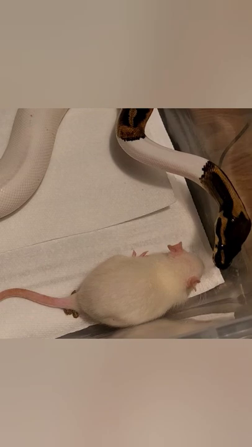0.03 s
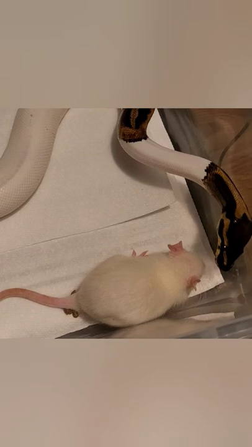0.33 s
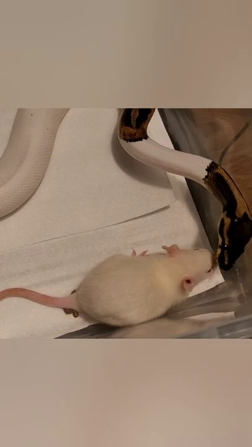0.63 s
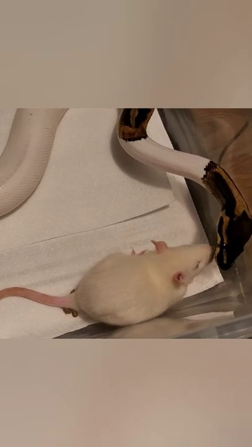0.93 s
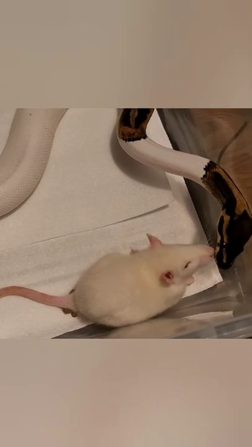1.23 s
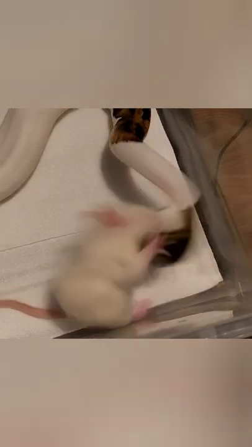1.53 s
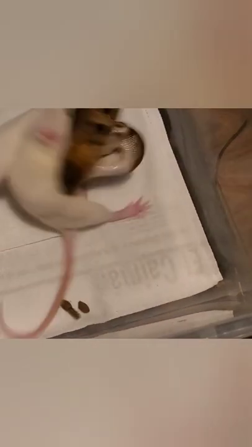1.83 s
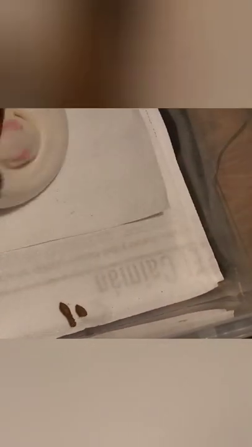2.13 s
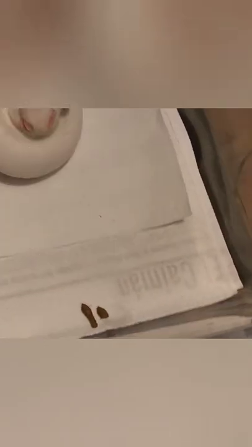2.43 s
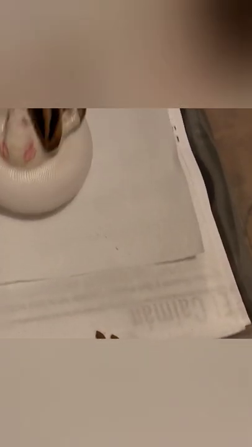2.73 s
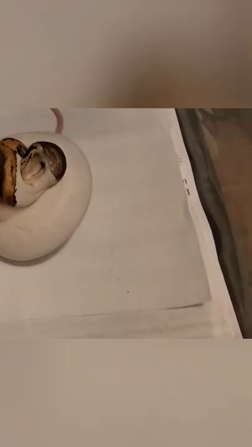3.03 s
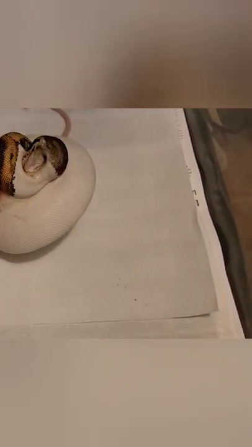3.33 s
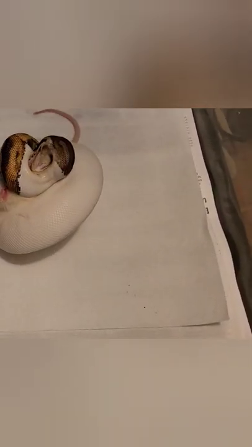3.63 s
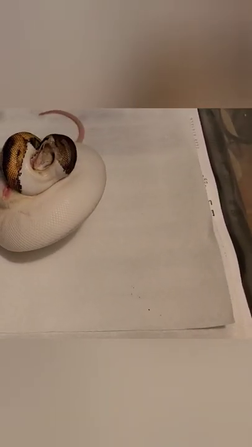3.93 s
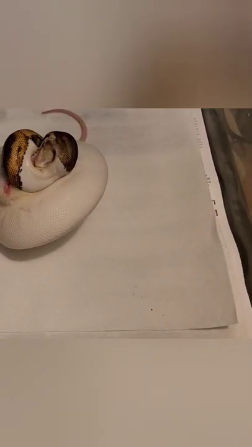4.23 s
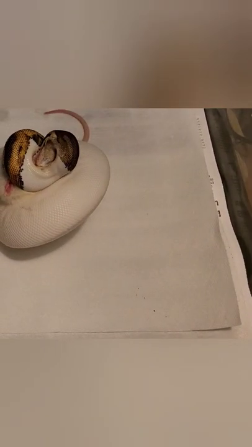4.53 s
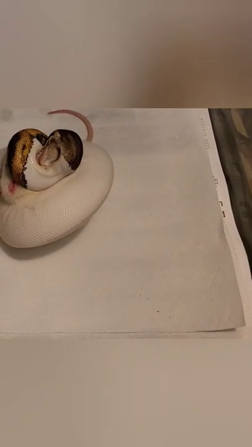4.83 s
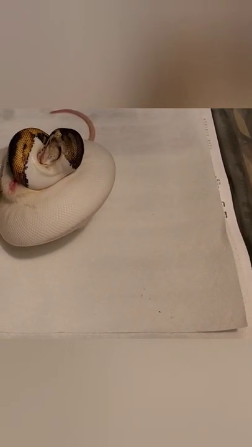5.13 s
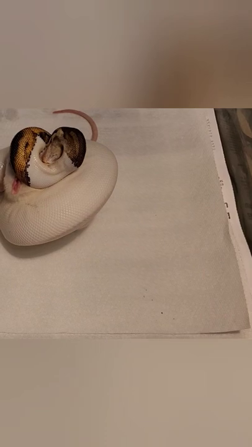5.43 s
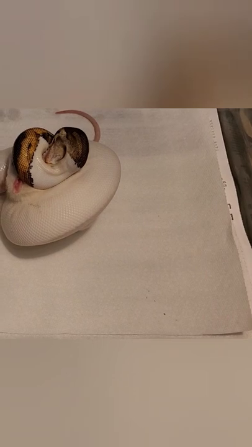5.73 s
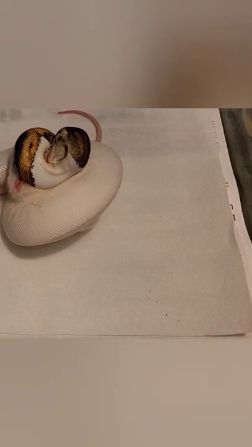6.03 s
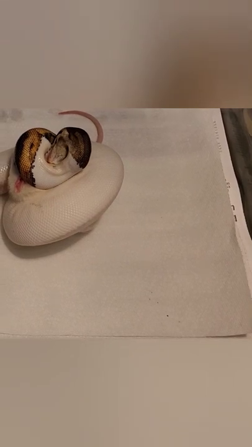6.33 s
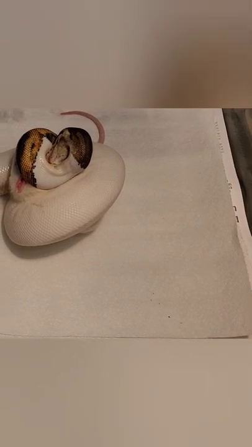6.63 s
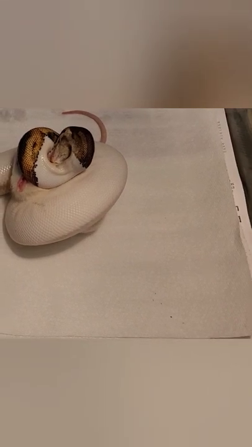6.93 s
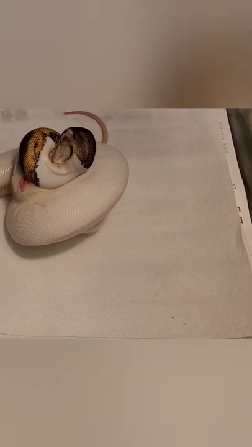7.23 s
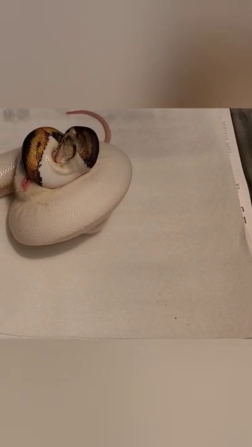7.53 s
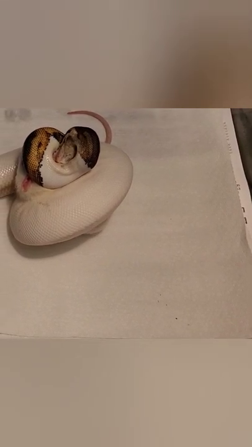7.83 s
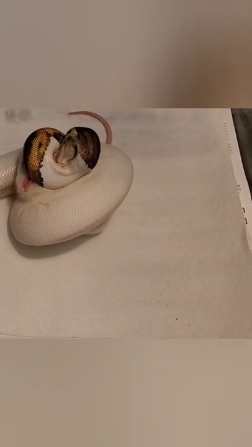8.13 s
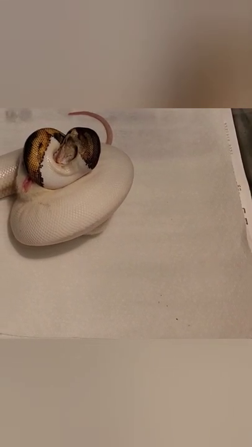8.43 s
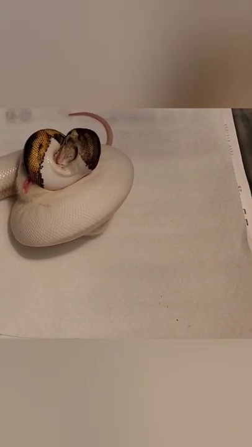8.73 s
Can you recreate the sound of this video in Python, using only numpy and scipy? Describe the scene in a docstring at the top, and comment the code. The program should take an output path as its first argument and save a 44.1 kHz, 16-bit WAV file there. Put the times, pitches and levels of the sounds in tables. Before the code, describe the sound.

A low ventilation rumble fills a quiet room. Then a snake strikes a rat in a nearby plastic tub: a quick flurry of hollow thumps, knocks and sharp slaps on the paper lining, over in less than a second. Scales slide across the paper more and more softly as the coil tightens, and the creases give a few small ticks before only the hum is left.

```python
"""Snake strike in a plastic tub.

A snake strikes a rat in a paper-lined tub. The bodies slam on floor and walls in a quick run of
thumps and slaps; then scales slide over the paper as the coil tightens, and creases give a few
last ticks. Low ventilation rumbles in the quiet room."""
import sys
import numpy as np
from scipy import signal
from scipy.fft import rfft, irfft
from scipy.io import wavfile
from scipy.ndimage import map_coordinates

SR = 44100
rng = np.random.default_rng(int(sys.argv[2]) if len(sys.argv) > 2 else 0)


def put_to_file(sound):
    """Save the sound as 16-bit audio at rate SR, in the file named by the first command-line argument."""
    columns = np.atleast_2d(sound).T  # one column per channel
    safe = np.clip(columns, -1, 1)
    whole_steps = np.round(safe * 32767)
    wavfile.write(sys.argv[1], SR, whole_steps.astype(np.int16))


N = 396900
TIME = np.arange(N) / SR
AGE = TIME[:SR * 3 // 5]  # clock of one event, 0.6 s


# Body impacts: (time [s], knock [dB], thud [dB], slap [dB], knock centre [Hz], thud centre [Hz],
# slap centre [Hz], tub pitch [Hz], pan [dB])
BLOWS = [(1.7119, -22, -38.5, -21.5, 686, 240, 4296, 288, 2.5),
         (1.8, -38.5, -52, -34, 650, 160, 3200, 335, .3),
         (1.8084, -33, -52.5, -26, 1120, 170, 1901, 330, 0.5),
         (1.8641, -17, -20, -29, 335, 155, 1500, 274, 2.4),
         (1.8744, -20.5, -21, -39.5, 260.7, 100, 2000, 298, 1.5),
         (1.888, -27, -29, -48, 479.4, 55, 2000, 300, -1.5),
         (1.9159, -15.5, -27, -17.5, 510, 226.6, 3900, 337, 0),
         (1.938, -29.5, -30, -45.5, 370, 60.2, 2500, 361, 1),
         (1.9714, -20, -34.5, -19, 670, 109.9, 1710, 300, 1.2),
         (1.9835, -30.5, -42, -30.5, 698.6, 110, 2000, 321.3, -0.5),
         (2.1678, -25.5, -33.5, -37, 437, 156, 3900, 296, 1),
         (2.2122, -31, -25, -40, 283, 109, 1690, 312, 1), (2.221, -35.5, -36, -37, 910, 198, 1800, 315, 1),
         (2.243, -34, -27, -46, 430, 46, 2090, 291, 0), (2.296, -45.5, -42, -64, 300, 100, 2600, 293, -2.5),
         (2.325, -42, -33.5, -43.5, 605, 58.3, 2450, 297, 1),
         (2.42, -38.5, -33, -51, 332, 140, 3400, 314, 1.2),
         (2.437, -50.5, -39, -54, 275, 145.4, 3030, 286, 1),
         (2.586, -58, -52.5, -59, 500, 130.6, 1400, 293, 0),
         (3.056, -62, -41.5, -81, 260, 55, 3190, 291, -0.2)]

def blows(low_cut_hz=19):
    """Each blow bends the floor, knocks the walls and slaps the paper; flesh sounds lower than bone."""
    out = np.zeros((2, N))
    for s, knock_db, thud_db, slap_db, knock_hz, thud_hz, slap_hz, tub_hz, pan_db in BLOWS:
        thud = from_db(thud_db) * floor_thud(thud_hz)
        knock = from_db(knock_db) * wall_knock(knock_hz, tub_hz)
        slap = from_db(slap_db) * (paper_slap(slap_hz) + paper_crack(slap_hz))
        add(out, s, panned(thud + knock + slap, db=pan_db))
    return signal.sosfilt(signal.butter(2, low_cut_hz, "high", fs=SR, output="sos"), out)


# Tub floor modes: (frequency [Hz], relative level [dB], t60 [s])
FLOOR_MODES = [(47.25, -3, 0.32), (64.3, 2.5, 0.15), (94, -15, 0.06), (139.4, 0, 0.093),
               (178.8, 0.5, 0.068), (215.7, -4.5, 0.032)]
DETUNE = 0.013  # relative pitch scatter: each blow meets the tub bent differently

def floor_thud(hz, rise_cycles=0.74):
    """The flexible floor rings as a body presses into it."""
    floor = ring(FLOOR_MODES, scatter_db=5, spread_rad=1, detune=DETUNE) * rise(rise_cycles / hz)
    return panned(unit_onset(bandpass(floor, hz, octaves=0.61), samples=1500), db=0.5)


# Plastic wall modes: (frequency [Hz], relative level [dB], t60 [s])
WALL_MODES = [(278.5, 0.5, 0.085), (360, -10, 0.074), (421.7, -11, .1), (453, -7.5, 0.09),
              (490, -2.5, 0.026), (559, -3.5, 0.043), (602, -7, 0.064), (725, -2, 0.072),
              (775, -5.5, 0.069), (815, -4.5, 0.058), (1000, -9, 0.055), (1142.6, -8, 0.058)]
# Wall clatter spectrum: (frequency [Hz], relative density [dB])
CLATTER_SPECTRUM = [(120, -15.5), (250, -2.5), (500, -2.5), (800, -6.5), (1100, -6.5), (1400, -12),
                    (3000, -36)]

def wall_knock(hz, tub_hz, clatter_db=1, punch_db=7, rise_cycles=0.93):
    """The walls ring and clatter; body load shifts the lowest mode most, soft contact builds slowly."""
    clatter = echoed(smack(CLATTER_SPECTRUM, t60=0.09, spike=1.5, spike_s=0.0025), tub_hz)
    shift = tub_hz / WALL_MODES[0][0]
    loaded = [(mode_hz * shift ** (1 / (k + 1)), db, t60)
              for k, (mode_hz, db, t60) in enumerate(WALL_MODES)]
    walls = ring(loaded, scatter_db=3.5, spread_rad=1, detune=DETUNE) + from_db(clatter_db) * clatter
    knock = bandpass(walls * rise(rise_cycles / hz), hz, octaves=0.89)
    return unit_onset(knock, samples=1300) + from_db(punch_db) * punch(hz)


def punch(hz, width_cycles=0.32, right_lag_s=0.00012):
    """The wall gives way and springs back: one pressure swing."""
    phase = hz * (AGE - np.array([[0], [right_lag_s]])) / width_cycles - 2
    return (2 * phase ** 2 - 1) * np.exp(-phase ** 2) * rise(1 / (2 * np.pi * hz))


def echoed(x, tub_hz, echo_gain=0.42):
    """Add one return from the far wall, a period of the tub's pitch later."""
    return x + echo_gain * np.array([np.interp(AGE - 1 / tub_hz, AGE, side, left=0) for side in x])


# Paper slap spectrum: (frequency [Hz], relative density [dB])
SLAP_SPECTRUM = [(700, -14.5), (1400, 0.5), (2200, 0), (3500, -0.5), (5000, -3.5), (7000, -10),
                 (15000, -29.5)]
# Modes of the sheet on plastic: (frequency [Hz], relative level [dB], t60 [s])
SHEET_MODES = [(1700, -1, 0.12), (1930, -3, 0.049), (2430, -6.5, 0.094), (2300, -5, 0.065),
               (2580, -5.5, 0.038), (3500, -5.5, .04), (3780, -6, .05), (4250, -4.5, .035),
               (4960, -6.5, .05), (6150, -7.5, .04)]

def paper_slap(hz, sheet_db=-16):
    """The sheet is slapped flat and rings faintly."""
    slap = smack(SLAP_SPECTRUM, t60=0.04, spike=1.2, spike_s=0.00085) * crackle(depth_db=4)
    sheet = from_db(sheet_db) * ring(SHEET_MODES, scatter_db=1, spread_rad=0.9, detune=DETUNE)
    return unit_onset(bandpass(slap + sheet, hz, octaves=0.9), samples=130)


# Paper crack spectrum: (frequency [Hz], relative density [dB])
CRACK_SPECTRUM = [(2500, -22), (5000, -11), (7000, -2), (9500, -2.5), (13000, -6), (15500, -14)]

def paper_crack(slap_hz, ref_db=-13.5, ref_hz=3500, db_per_octave=11.5):
    """A slap also cracks, the louder the higher its pitch."""
    gain = from_db(ref_db + db_per_octave * np.log2(slap_hz / ref_hz))
    return gain * smack(CRACK_SPECTRUM, t60=0.06, spike=0.9, spike_s=0.002) * crackle(depth_db=-1)


# Large creases: (time [s], onset level [dB], centre [Hz], t60 [s], half width [octaves])
SNAPS = [(1.632, -62.5, 5900, 0.022, 0.47), (1.741, -39, 4000, 0.021, 0.66), (1.776, -48, 5500, 0.019, .6),
         (1.8, -43, 8000, 0.074, 1), (1.871, -26.5, 2700, 0.11, 0.87), (1.902, -41, 4480, .02, .8),
         (1.9875, -31, 5564, 0.017, .25), (2.007, -33, 3000, .02, .6), (2.117, -42.5, 2500, 0.018, 0.44),
         (2.162, -35.5, 6840, 0.037, 0.95), (2.198, -52, 4460, .015, .6), (2.219, -37, 2120, 0.12, 1.03),
         (2.586, -45.5, 2610, 0.074, 1.5), (2.872, -59.5, 3800, 0.031, .6), (3.121, -64.5, 7950, .06, .7),
         (3.206, -63.5, 4190, .02, .6), (3.449, -68, 7020, .03, 0.41), (3.464, -68.5, 6450, .03, 0.37),
         (3.503, -65.5, 2203, .05, 1.4), (3.644, -65, 1995, 0.063, 1.53), (4.0125, -77, 9500, 0.017, 0.32),
         (4.021, -61, 4390, 0.03, 0.55), (4.107, -67, 1690, 0.054, 1.44), (4.261, -72, 2405, 0.043, .7),
         (4.288, -57, 4000, 0.031, 0.93), (4.374, -56, 5670, 0.041, 0.76), (4.395, -65, 5480, 0.047, 0.83),
         (4.528, -73, 8990, 0.037, .8), (4.852, -72.5, 5780, 0.04, .2), (5.025, -74, 10000, .03, .7),
         (5.452, -72, 5600, 0.042, .13)]
# Paper rustle spectrum: (frequency [Hz], relative density [dB])
RUSTLE_SPECTRUM = [(200, -1.5), (500, -5), (1000, -3), (1500, -3.5), (2400, 1.5), (3100, 1), (4500, -4),
                   (6100, -3), (7500, -4.5), (10000, -7), (13000, -3.5), (15500, -10.5)]

def snaps():
    """A crease pops over with a sharp edge; the sheet rings briefly around one pitch."""
    out = np.zeros((2, N))
    for s, db, hz, t60, octaves in SNAPS:
        pop = smack(RUSTLE_SPECTRUM, t60, spike=0.46, spike_s=0.00075) * crackle(depth_db=2)
        add(out, s, from_db(db) * unit_onset(bandpass(pop, hz, octaves, order=2), samples=200))
    return out


def coil_effort(start_s=1.63, attack_s=0.1, hold_s=0.18, creep_fade_s=6.47):
    """Rubbing gain: the coil whips round the rat, slows steadily, then creeps to rest."""
    age = TIME - start_s
    wrap = hold_and_fade(db=-49.5, until_s=start_s + attack_s + hold_s, db_per_s=16.5)
    creep = hold_and_fade(db=-81.5, until_s=creep_fade_s, db_per_s=14)
    return np.clip(age / attack_s, 0, 1) ** 2 * np.hypot(wrap, creep)


# Brightness of the slide: (rubbing level [dB], treble gain [dB])
SLIDE_TREBLE = [(-73, -3.5), (-65.5, 2)]

def slide(effort, treble_hz=6500):
    """Scales slide over the paper, duller as the coil slows."""
    rub = scraping(N)
    dull = signal.sosfiltfilt(signal.butter(2, treble_hz, fs=SR, output="sos"), rub)
    treble_db = np.interp(20 * np.log10(effort + 1e-9), *np.transpose(SLIDE_TREBLE))
    return effort * (dull + from_db(treble_db) * (rub - dull))


def scraping(samples, catches_per_s=3000, friction=0.43):
    """Scales catch on paper fibres: tiny slips over a friction hiss."""
    slips = rng.random((2, samples)) < catches_per_s / SR
    excitation = (slips + friction) * rng.standard_normal((2, samples))
    return bending(coloured(excitation, RUSTLE_SPECTRUM, NEAR_CORRELATION))


def bending(x, depth_db=2.6, bends_per_s=24, band_hz=330):
    """As the sheet bends, each narrow band swells and fades by itself."""
    hz, s, bands = signal.stft(x, SR, nperseg=512)
    shapes = rng.standard_normal((128, int(s[-1] * bends_per_s) + 2))
    grid = np.meshgrid(hz / band_hz, s * bends_per_s, indexing="ij")
    db = depth_db * map_coordinates(shapes, grid, order=1, mode="nearest")
    return unit_rms(signal.istft(bands * from_db(db), SR)[1][:, :x.shape[1]])


# Body sweeps: (middle [s], level [dB], Gaussian sigma [s], centre [Hz], half width [octaves])
SWEEPS = [(0.598, -69, .018, 1350, 0.8), (1.665, -59.5, 0.017, 9950, 2.1), (1.691, -47, 0.015, 600, 0.67),
          (1.731, -44.5, 0.018, 8000, 0.94), (1.876, -53, 0.011, 8070, 1.4), (2.027, -39, 0.02, 7984, 2.6),
          (2.127, -42, 0.0066, 2770, 0.84), (2.252, -43.5, 0.039, 600, 0.36),
          (2.33, -49.5, 0.016, 6000, 1.2), (2.449, -42.5, 0.013, 8800, 4.9),
          (2.575, -56, 0.011, 2820, 0.61), (2.683, -53.5, 0.027, 4180, 0.68),
          (2.752, -61.5, 0.12, 11140, 0.73), (2.887, -62.5, 0.028, 3190, 0.39),
          (2.974, -64, 0.042, 3400, 0.28), (3.092, -64, 0.041, 3020, 0.65), (3.166, -67.5, 0.011, 3500, .6),
          (3.332, -65, 0.028, 3600, 1.37), (3.58, -75, 0.069, 2500, 1.2), (5.95, -78.5, 0.024, 11010, 1)]

def sweeps(strokes=SWEEPS):
    """A body brushes across the sheet, its speed rising and falling."""
    out = np.zeros((2, N))
    middle_s = AGE[-1] / 2
    for s, db, sigma_s, hz, octaves in strokes:
        swell = np.exp(-0.5 * ((AGE - middle_s) / sigma_s) ** 2)
        rub = unit_rms(bandpass(scraping(len(AGE)), hz, octaves))
        add(out, s - middle_s, from_db(db) * swell * rub)
    return out


def crinkles(effort, per_s=9, scatter_db=1.5, centre_hz=3400):
    """Small creases give way at random under the coil, as loud as it presses."""
    triggers = (rng.random(N) < per_s / SR) * effort * from_db(scatter_db * rng.uniform(-1, 1, N))
    pop = bandpass(burst(RUSTLE_SPECTRUM, t60=0.049, rise_s=0.0004), centre_hz, octaves=0.5)
    return signal.fftconvolve(triggers[None], unit_onset(pop, samples=200), axes=1)[:, :N]


# Squeak resonances: (frequency [Hz], level [dB])
SQUEAK_BANDS = [(3150, -51.5), (7270, -52)]

def squeak(time_s=2.455, sigma_s=0.0065, octaves=0.023):
    """One fast sweep of scales on plastic excites two narrow resonances."""
    return sweeps([(time_s, db, sigma_s, hz, octaves) for hz, db in SQUEAK_BANDS])


# Taut crease modes: (frequency [Hz], level [dB], t60 [s])
CLICK_MODES = [(3100, -56, 0.016), (3300, -55, 0.021), (5590, -52, 0.022), (5910, -54, 0.016)]

def click(time_s=4.019):
    """One taut crease clicks with a short, clear ring."""
    out = np.zeros((2, N))
    add(out, time_s, ring(CLICK_MODES, scatter_db=1, spread_rad=0.26) * crackle(depth_db=1))
    return out


# Reverb decay of tub and room: (frequency [Hz], t60 [s])
ROOM_T60 = [(60, 0.6), (300, 0.7), (600, 0.6), (1200, 0.8), (4000, 0.16), (14000, 0.66)]
# Reverb strength: (frequency [Hz], impulse response energy per octave [dB])
ROOM_DB = [(60, -20), (300, -11), (700, -15.5), (1300, -15), (4000, -7), (14000, -14)]

def room(x, build_s=0.0012):
    """Diffuse echoes build quickly and die at their own rate in each octave."""
    tail = 0
    edges_hz = 40 * 2. ** np.arange(10)
    for low, high in zip(edges_hz, edges_hz[1:]):
        hz = np.sqrt(low * high)
        octave = signal.butter(2, [low, high], "band", fs=SR, output="sos")
        band = signal.sosfilt(octave, rng.standard_normal((2, len(AGE))))
        envelope = decay(at_hz(ROOM_T60, hz)) * (1 - np.exp(-(AGE / build_s) ** 2))
        tail = tail + band * envelope / np.linalg.norm(envelope) * from_db(at_hz(ROOM_DB, hz))
    return signal.fftconvolve(x, tail, axes=1)[:, :N]


# Ventilation spectra: (frequency [Hz], relative density [dB])
RUMBLE_SPECTRUM = [(12, -71.5), (20, -40), (32, -19.5), (46, -9), (70, 0), (97, -8.5), (118, -17),
                   (160, -15.5), (235, -25.5), (400, -49.5), (1000, -90)]
AIR_SPECTRUM = [(220, -16.5), (300, 0.5), (338, -5.5), (410, -2.5), (520, -8), (780, -12), (1030, -17.5),
                (1920, -22), (2500, -44), (3250, -65), (5500, -105)]
HISS_SPECTRUM = [(1500, -22.5), (1950, -1.5), (2500, -9.5), (3200, 0.5), (4700, 2), (5500, -12),
                 (7000, -14), (8200, -20.5), (10300, -21.5), (12300, -16), (15500, -20)]
# Air rush: (time [s], level [dB])
AIR_LEVEL = [(0, -65.5), (1.5, -65), (3.2, -65), (5.6, -65.5), (7.0, -65.5), (7.8, -64), (8.2, -66),
             (9, -65.5)]
# Steady tones: (frequency [Hz], level [dB])
WHINE_TONES = [(312, -80), (361, -77.5), (1884, -95), (2126, -101), (4650, -96), (4716, -93), (5599, -103),
               (7402, -107), (10261, -108), (12199, -107), (12398, -106), (14659, -105)]
# Stereo image of far sound: (frequency [Hz], left-right correlation [-1..1])
FAR_CORRELATION = [(60, 0.94), (130, 0.98), (290, 0.46), (640, -0.29), (1410, -0.48), (3100, -0.03),
                   (6820, -0.099), (15000, 0.18)]

def ventilation(rumble_db=-56.5, hiss_db=-73.5, waver_db=0.4, wavers_per_s=5):
    """Distant ventilation: a wavering rumble, a soft rush of air, a faint hiss and a thin whine."""
    def noise(spectrum):
        return coloured(rng.standard_normal((2, N)), spectrum, FAR_CORRELATION)

    waver = np.interp(TIME * wavers_per_s, np.arange(2000), rng.standard_normal(2000))
    rumble = from_db(rumble_db + waver_db * waver) * noise(RUMBLE_SPECTRUM)
    air = from_db(np.interp(TIME, *np.transpose(AIR_LEVEL))) * noise(AIR_SPECTRUM)
    hiss = from_db(hiss_db) * noise(HISS_SPECTRUM)
    whine = sum(from_db(db) * np.sin(2 * np.pi * (hz * TIME + rng.random((2, 1))))
                for hz, db in WHINE_TONES)
    return rumble + air + whine + panned(hiss, db=1.12)


# Stereo image of near sound: (frequency [Hz], left-right correlation [-1..1])
NEAR_CORRELATION = [(60, 0.93), (250, 0.46), (600, 0.54), (1500, -0.0028), (3500, -0.54), (8000, 0.023),
                    (15000, 0.2)]

def burst(spectrum, t60, rise_s):
    """Modes too dense to tell apart, struck at once and dying together."""
    noise = coloured(rng.standard_normal((2, len(AGE))), spectrum, NEAR_CORRELATION)
    return noise * decay(t60) * rise(rise_s)


def smack(spectrum, t60, spike, spike_s):
    """A flat hit: a sharp spike, then a short dying spray."""
    return burst(spectrum, t60, rise_s=0.0001) * (1 + spike * np.exp(-AGE / spike_s))


def ring(modes, scatter_db, spread_rad, detune=0):
    """Struck modes; higher ones reach the two ears further out of phase."""
    out = np.zeros((2, len(AGE)))
    for k, (hz, db, t60) in enumerate(modes):
        size = np.searchsorted(AGE, 2 * t60)
        phase = np.array([[1], [-1]]) * spread_rad * np.sqrt(hz / 1000) * (-1) ** (k // 2)
        gain = from_db(db + scatter_db * rng.normal()) * (-1) ** (k // 3)
        pitch_hz = hz * (1 + detune * rng.normal())
        out[:, :size] += gain * decay(t60)[:size] * np.sin(2 * np.pi * pitch_hz * AGE[:size] + phase)
    return out


def crackle(depth_db, step_s=0.00063):
    """Jumping gain of paper giving way in quick, uneven cracks."""
    steps = np.clip(rng.standard_normal(3000), -2, 2)
    return from_db(depth_db * np.interp(AGE / step_s, np.arange(len(steps)), steps))


def coloured(white, spectrum, correlation):
    """Shape two independent noises to a stereo pair of unit rms."""
    size = white.shape[1]
    hz = np.fft.rfftfreq(size, 1 / SR)
    low_cut = np.minimum(hz / spectrum[0][0], 1) ** 2
    mid, side = rfft(white) * from_db(at_hz(spectrum, hz)) * low_cut
    alike = np.clip(at_hz(correlation, hz), -0.99, 0.99)
    return unit_rms(irfft(np.sqrt(1 + alike) * mid + np.sqrt(1 - alike) * side * [[1], [-1]], size))


def bandpass(x, hz, octaves, order=1):
    """Causal band-pass; octaves is the half width."""
    edges = np.clip([hz / 2 ** octaves, hz * 2 ** octaves], [20, 100], [SR / 4, SR * 0.45])
    return signal.sosfilt(signal.butter(order, edges, "band", fs=SR, output="sos"), x)


def rise(tau_s):
    return 1 - np.exp(-AGE / tau_s)


def decay(t60):
    return np.exp(-np.log(1000) * AGE / max(t60, 0.003))


def hold_and_fade(db, until_s, db_per_s):
    return from_db(db - db_per_s * np.maximum(TIME - until_s, 0))


def from_db(db):
    return 10 ** (np.asarray(db) / 20)


def unit_rms(x):
    return x / np.sqrt(np.mean(x ** 2) + 1e-20)


def unit_onset(x, samples):
    """Scale so the first samples have unit rms."""
    return x / np.sqrt(np.mean(x[:, :samples] ** 2) + 1e-20)


def at_hz(points, hz):
    """Read a table along log frequency."""
    known_hz, value = np.transpose(points)
    return np.interp(np.log(np.maximum(hz, 1)), np.log(known_hz), value)


def panned(x, db):
    """Raise the left side and lower the right."""
    return x * from_db([[db], [-db]])


def add(out, s, sound):
    """Mix a stereo sound in at s seconds."""
    start = max(round(s * SR), 0)
    out[:, start:start + sound.shape[1]] += sound[:, :out.shape[1] - start]


def scene():
    """The tub lies close by, a little to the left."""
    effort = coil_effort()
    tub = blows()
    paper = panned(snaps() + slide(effort) + sweeps() + crinkles(effort) + squeak(), db=0.7)
    return tub + paper + room(tub + paper) + click() + ventilation()


def record(dry, ceiling=1.2, cutoff_hz=15450):
    """Soft clip, then a steep low-pass."""
    rounded = ceiling * np.tanh(dry / ceiling)
    return signal.sosfilt(signal.ellip(10, 0.1, 80, cutoff_hz, fs=SR, output="sos"), rounded)


dry = scene()
out = record(dry)
put_to_file(out)
```